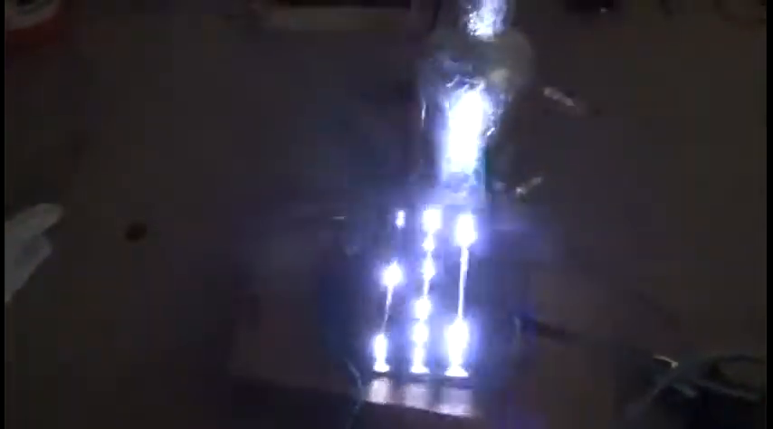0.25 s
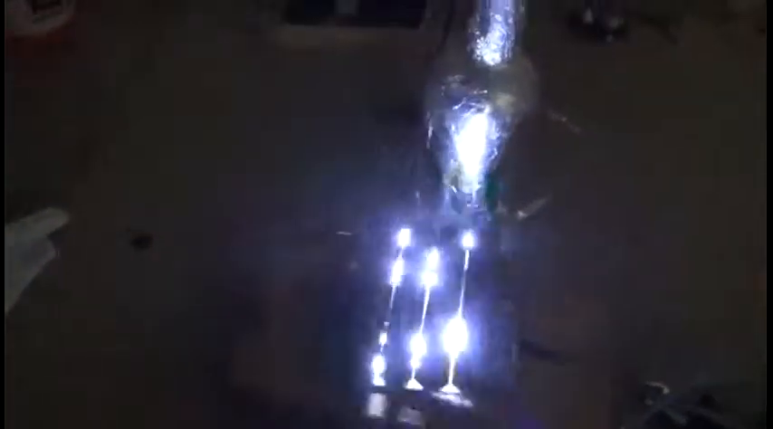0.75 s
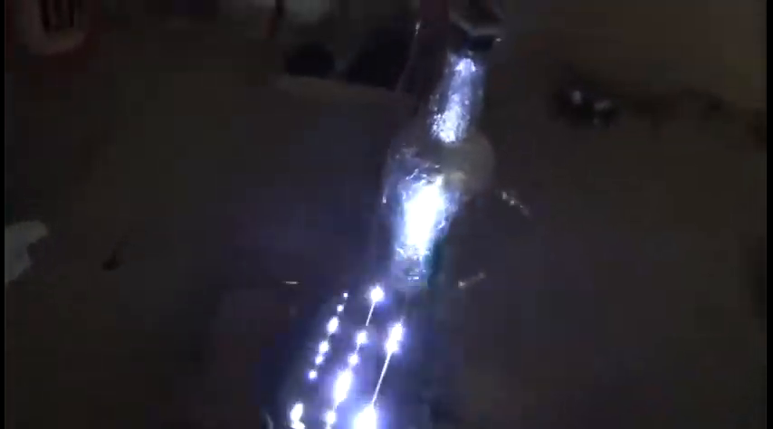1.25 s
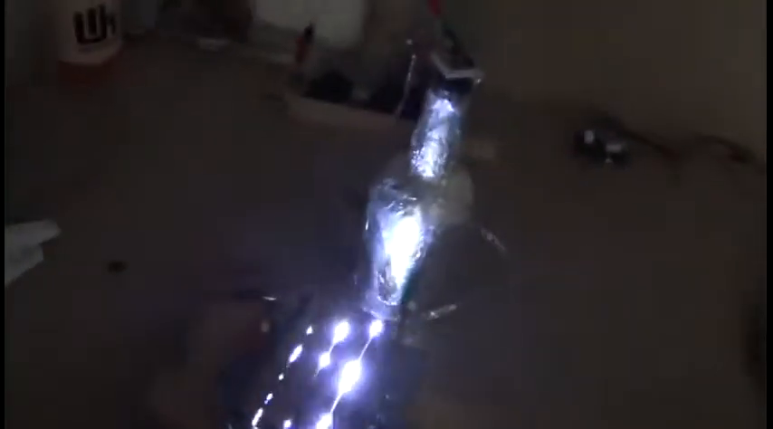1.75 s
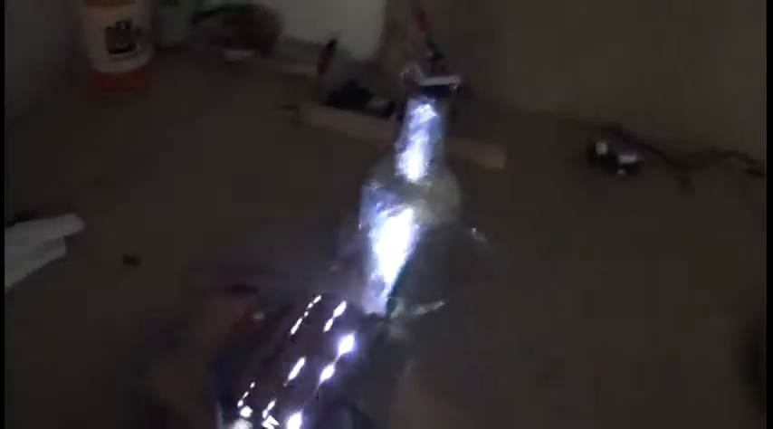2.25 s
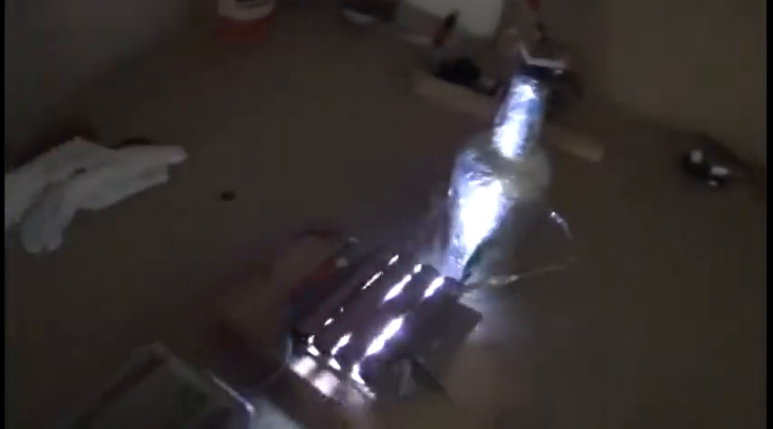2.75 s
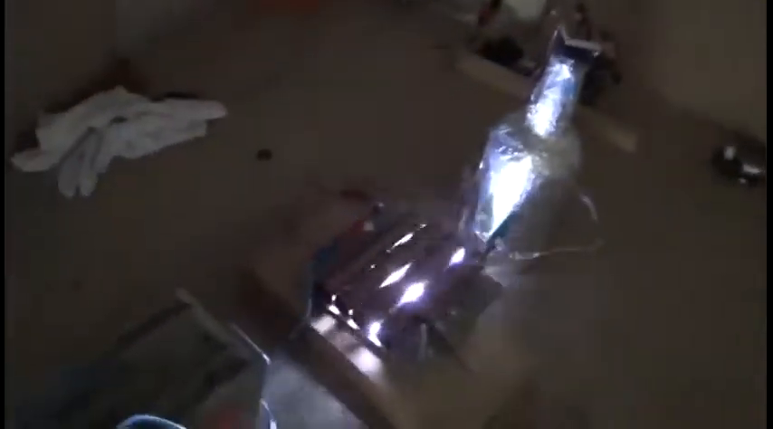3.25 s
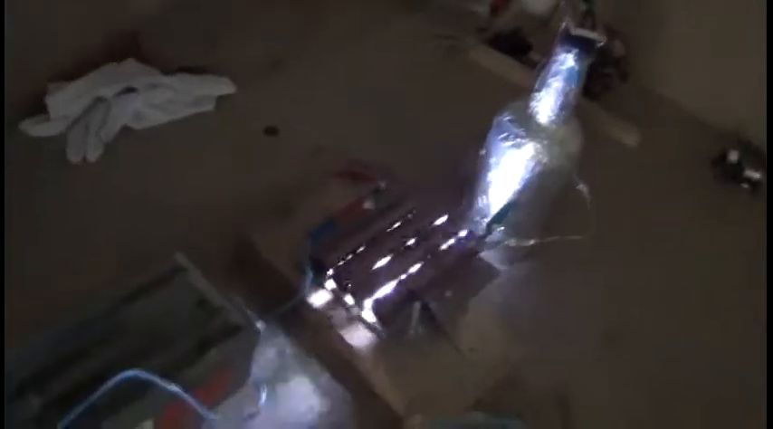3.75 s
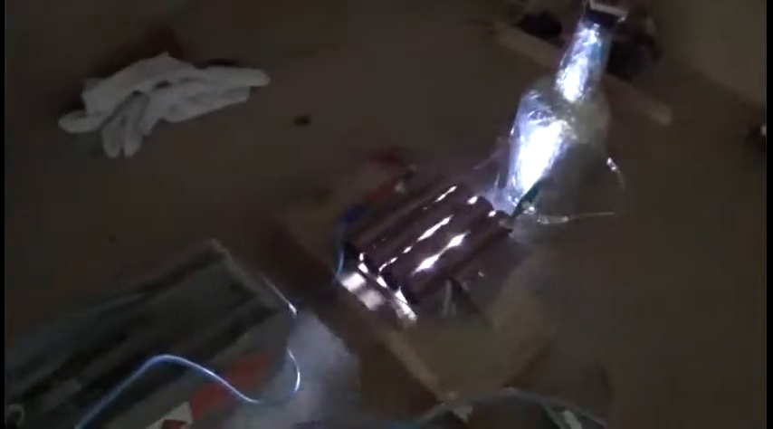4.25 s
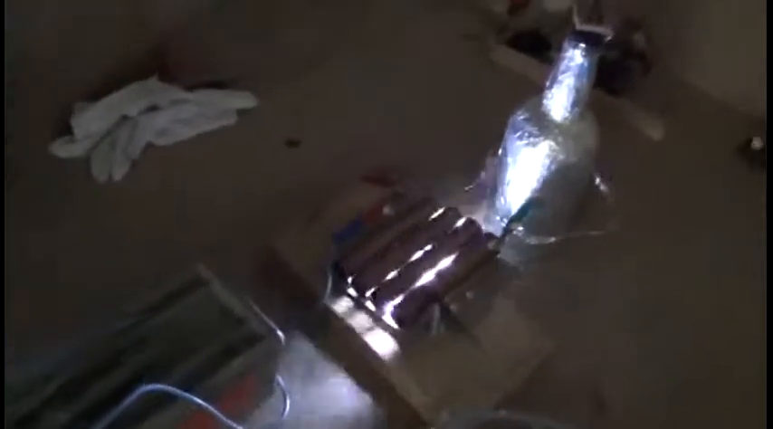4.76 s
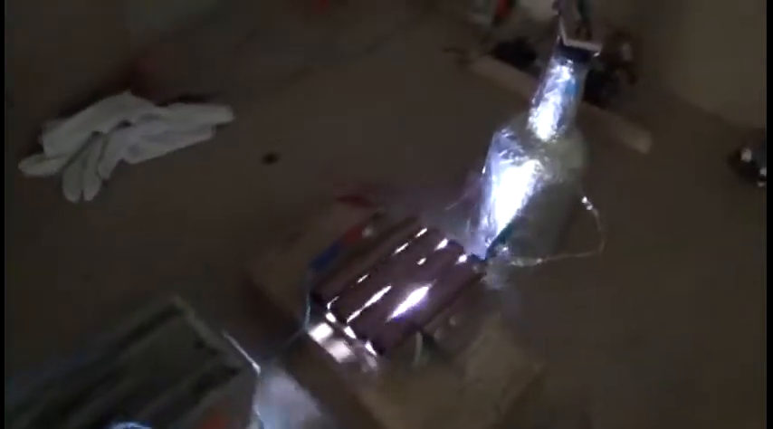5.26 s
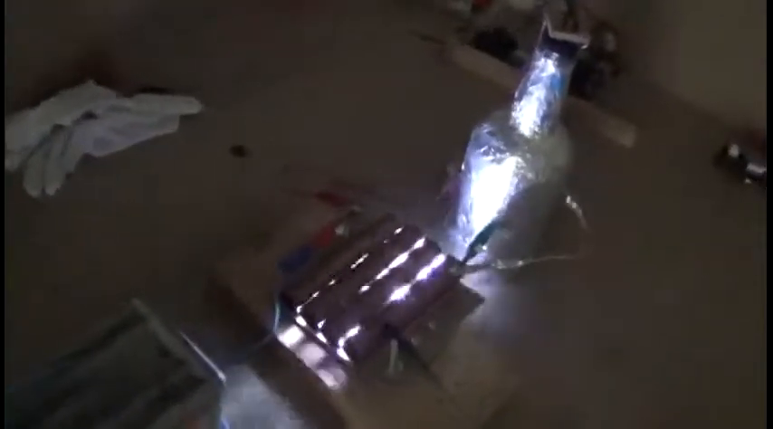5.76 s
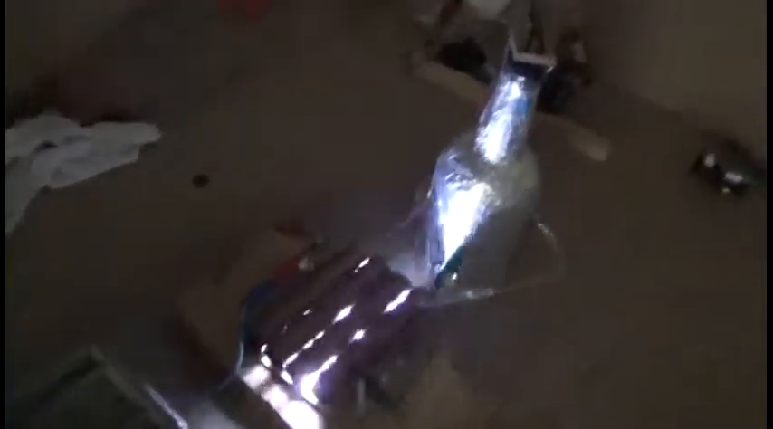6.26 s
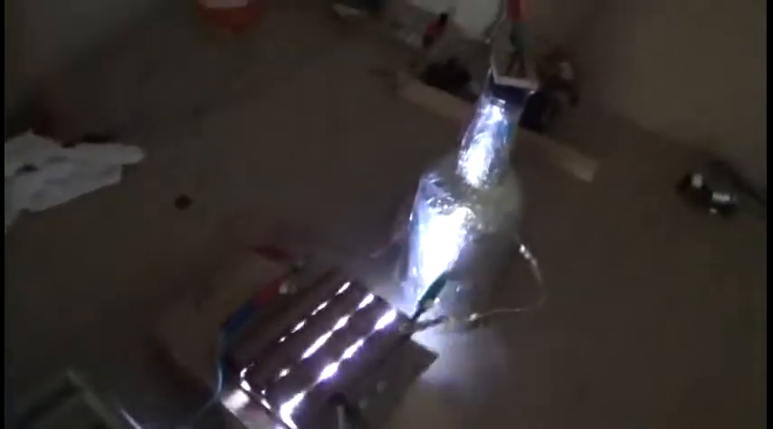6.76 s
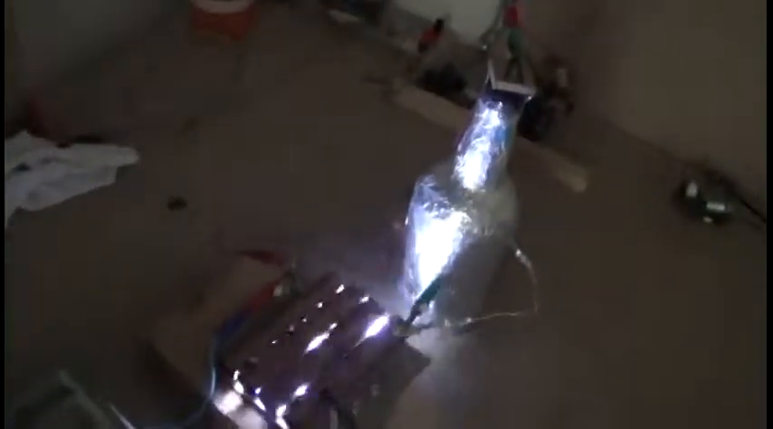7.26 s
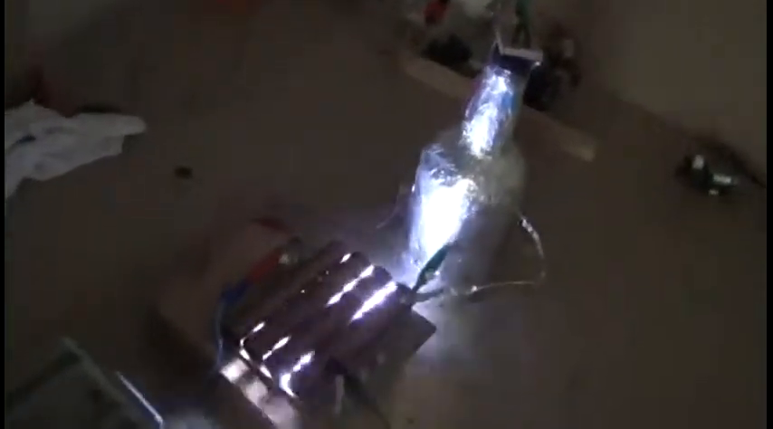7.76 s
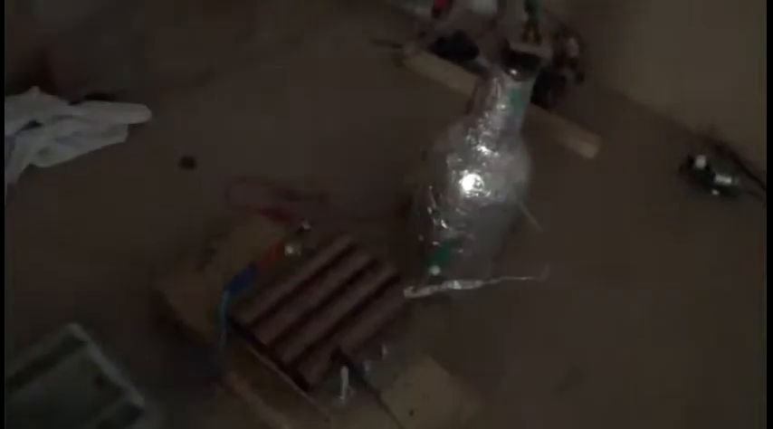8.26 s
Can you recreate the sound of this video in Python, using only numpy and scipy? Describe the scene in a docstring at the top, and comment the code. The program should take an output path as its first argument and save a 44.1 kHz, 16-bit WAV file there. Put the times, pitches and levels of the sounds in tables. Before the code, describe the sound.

Dense, bright electric sparks crackle and buzz in a bare room until they cut out and a power switch clicks.

```python
"""A harsh electric crackle over a low buzz, in a bare room, heard through two closely spaced mic ports.
A multi-gap spark gap, fed from a mains transformer and a bottle capacitor, fires a volley of sparks
every half cycle; charge left on the capacitor makes the volleys alternately long and short.
Air rings in the electrode tubes. The cracks' ultrasound overdrives the microphone, which turns their
envelope into the buzz. Near the end the sparks stop and the power switch snaps."""
import sys
import numpy as np
from scipy import signal
from scipy.fft import rfft, irfft, next_fast_len
from scipy.io import wavfile
from scipy.ndimage import uniform_filter1d

SR = 44100
rng = np.random.default_rng(int(sys.argv[2]) if len(sys.argv) > 2 else 0)


def output_pcm(signal):
    """Save a mono or channel-first signal as 16-bit PCM at the path in sys.argv[1].

    Samples are clipped to [-1, 1] before scaling.
    """
    pcm = np.clip(np.atleast_2d(signal).T, -1, 1) * 32767
    wavfile.write(sys.argv[1], SR, np.round(pcm).astype(np.int16))


N = 374850
HALF_CYCLE_S, OFF_S = .01, 8.281
GRAIN_ALIKE, GRAIN_FROM_HZ = 0.22, 190   # low crackle: left-right likeness, lower edge
LEFT_RIGHT = np.array([[1], [-1]])

# snap and bounces of the switch: t/s, level/dB
SWITCH_HITS = [(8.3348, -40.5), (8.337, -36.5), (8.341, -47), (8.345, -44), (8.35, -51), (8.355, -41.5),
               (8.361, -58)]
# modes of the switch and its case: f/Hz, gain/dB, t60/s
SWITCH_MODES = [(350, -12, .08), (396, -13, 0.12), (462, -16.5, 0.18), (493, -20, 0.074), (657, -11, 0.064),
                (1150, -4.5, 0.029), (1910, 2, 0.014), (2430, -8, 0.012), (3300, 2.5, 0.0052),
                (4900, 9.5, 0.0035), (10200, 5, 0.0056)]
# fuller sputters in the low crackle: t/s, level/dB
SPUTTERS = [(0.15, -40), (0.246, -30), (0.284, -33), (0.346, -35), (0.423, -48), (0.464, -46),
            (0.505, -29.5), (0.535, -32), (0.579, -34), (0.623, -35), (0.997, -34), (1.124, -35),
            (1.265, -31), (1.297, -28), (1.374, -41), (1.406, -31), (1.484, -31), (1.609, -32),
            (1.797, -32), (1.858, -40), (2.185, -37), (2.357, -41), (2.667, -38), (2.856, -39),
            (5.186, -35), (5.266, -44), (6.177, -35), (6.926, -32), (7.218, -39), (7.697, -34)]
# strength of the microphone's overload buzz: t/s, level/dB
BUZZ_LEVEL = [(0.0, -55), (0.02, -41), (0.07, -45), (1.22, -44.5), (1.31, -38.5), (1.35, -45.5),
              (1.75, -48), (1.86, -39.5), (2.02, -46.5), (3.26, -56.5), (3.57, -49.5), (3.8, -56.5),
              (5.22, -55.5), (5.29, -47.5), (5.34, -54), (5.71, -53), (7.5, -51), (8.26, -54)]
# volley lag behind the half-cycle grid, by mains drift and distance to the mic: t/s, lag/ms
VOLLEY_LAG = [(0.0, 1.14), (4.5, 2.5), (8.5, 2.75)]
# the capacitor's bias changes side: t/s, bias (positive = even volleys long)
CAPACITOR_BIAS = [(0.015, -0.68), (0.365, 1), (0.695, -0.74), (1.005, 0.46), (1.305, -0.55), (1.405, 0.83),
                  (1.605, -0.84), (1.795, 0.71), (1.915, -0.39), (2.005, 0.78), (2.235, -0.39),
                  (2.335, 0.61), (2.515, -0.96), (2.605, 0.52), (2.705, -0.33), (2.885, 0.53),
                  (2.925, -0.26), (2.975, 0.86), (3.205, -0.88), (3.245, 0.78), (3.565, -0.99),
                  (3.775, 0.89), (4.045, -0.58), (4.115, 0.53), (4.205, -0.94), (4.535, 0.53),
                  (4.855, -0.82), (5.015, 0.43), (5.165, -0.67), (5.335, 0.42), (5.585, -0.4),
                  (5.635, 0.67), (5.855, -0.094), (5.915, 0.4), (6.085, -0.56), (6.185, 0.92),
                  (6.385, -0.88), (6.525, 0.65), (6.795, -0.56), (6.995, 1), (7.105, -0.5), (7.145, 0.54),
                  (7.285, -0.46), (7.355, 0.64), (7.475, -0.71), (7.615, 0.58), (7.925, -0.57),
                  (8.095, 0.81)]
# loudness of the cracks at the mic: t/s, level/dB
CRACK_LEVEL = [(0.0, -22.5), (1.4, -21), (1.42, -23), (1.77, -20), (1.84, -21), (1.89, -24), (1.93, -25),
               (2.0, -20), (3.18, -21), (3.73, -21), (3.8, -22), (4.3, -20.5), (4.6, -23.5), (4.69, -20.5),
               (4.81, -21), (7.08, -20), (8.21, -21.5), (8.26, -23)]
# loudest treble bursts: t/s, relative level/dB, length/ms
BURSTS = [(0.8694, -13, 4), (1.4102, -8, 3.7), (1.4184, -4, 4.4), (1.4396, -7, 4), (1.4596, -19, 4),
          (1.481, -7, 3.1), (1.5, -3, 4.2), (1.5205, -15, 3.5), (1.5599, -6, 3.7), (1.5798, -7, 4),
          (1.8013, -9, 3.9), (1.8218, -12, 3.6), (1.8304, -17, 4), (1.8397, -9, 4), (1.92, -2, 5.3),
          (1.9304, -3.5, 5.8), (1.9494, -7, 5.3), (1.9694, -13, 4), (2.0887, -8, 3.7), (2.4409, -10, 4),
          (2.5386, -6, 4), (2.5706, -10, 4), (2.952, -5, 4.7), (3.1004, -6, 5.5), (3.302, -1, 2.4),
          (3.4002, -10, 3.1), (3.5084, -7, 4.2), (3.6306, 0, 2.4), (3.71, -3, 5.8), (4.2298, -4, 3.7),
          (5.1407, -7, 4), (5.16, -13, 4), (5.3892, -9, 6.2), (5.662, -5, 3.2), (5.7698, 0, 3.1),
          (5.891, -5, 4), (6.0906, -7, 5.4), (6.1504, -14, 4), (6.4108, -8, 4.6), (6.4717, -3, 4.3),
          (6.7104, -2, 6.2), (6.8199, -13, 4), (6.93, -0.5, 5.1), (6.991, 0, 4.7), (7.0838, -7, 3.6),
          (7.1307, -6.5, 5), (7.1405, -10, 2.3), (7.1505, -13, 3.5), (7.17, -8, 2.5), (7.23, -8, 2.9),
          (7.3891, -1, 2.8), (7.471, -6, 4.6), (7.8426, -5, 3.6), (8.0391, -6, 4)]
# the gap flares in straight view of the mic: t/s, length/s, treble lift/dB (only lifts above 0 act)
FLARES = [(0.0, 0.2, -1.5), (1.416, 0.15, 2.5), (1.793, 0.2, 3), (3.503, .26, 1.5), (6.04, 0.14, 1.5),
          (6.953, 0.37, -0.5)]
# spectral shape of the sparks: f/Hz, gain/dB
SPARK_SPECTRUM = [(760, -26.5), (1300, -26), (2220, -20.5), (2670, -17.5), (3250, -21), (3620, -16.5),
                  (6010, -15.5), (9800, 1), (10900, 2.5), (14200, -39), (22000, -120)]
# air resonances in the electrode tubes: f/Hz, width/Hz, gain/dB
TUBE_MODES = [(1744, 130, -10.5), (2720, 115, -1.5), (4020, 65, -0.5), (4750, 340, -9.5), (5830, 230, -3),
              (6350, 96, -2.5)]
# a tube rings out for a few volleys: middle t/s, f/Hz, half length/ms, level/dB re the band's average
TUBE_PINGS = [(0.04, 4050, 35, 7), (0.236, 2660, 33, 14), (0.331, 6700, 31, 15), (0.37, 6150, 40, 9),
              (0.52, 4030, 27, 8), (0.546, 1710, 81, 10), (0.61, 4030, 25, 9), (0.729, 5970, 49, 16),
              (0.74, 3980, 25, 8), (0.817, 5970, 66, 15), (0.856, 4040, 35, 13), (0.892, 1790, 31, 11),
              (0.902, 4020, 39, 14), (1.025, 4050, 25, 8), (1.09, 4100, 35, 10), (1.13, 4780, 40, 7),
              (1.151, 1720, 35, 9), (1.548, 4110, 35, 12), (1.617, 1590, 33, 12), (1.803, 1600, 29, 9),
              (1.946, 1590, 43, 9), (1.947, 2770, 61, 12), (2.339, 3800, 31, 13), (2.386, 2710, 28, 23),
              (2.537, 6300, 37, 9), (2.54, 2730, 33, 7), (2.648, 2640, 98, 9), (2.971, 2770, 48, 16),
              (3.165, 2760, 47, 7), (3.382, 2700, 77, 13), (3.455, 2650, 45, 14), (3.844, 2660, 25, 16),
              (3.916, 2600, 37, 16), (4.786, 4720, 37, 10), (4.945, 3670, 51, 17), (5.02, 6400, 45, 7),
              (5.047, 2720, 31, 10), (5.201, 6400, 50, 7), (5.279, 2630, 63, 8), (5.313, 2640, 100, 6),
              (5.455, 2700, 53, 7), (5.559, 2700, 39, 7), (5.578, 6540, 65, 2), (5.72, 6500, 45, 8),
              (5.724, 2640, 45, 7), (5.98, 2600, 49, 7), (6.137, 2700, 26, 16), (6.23, 2700, 35, 8),
              (6.369, 2650, 33, 11), (6.729, 4110, 39, 11.5), (6.983, 2650, 37, 7), (7.244, 2580, 29, 7),
              (7.346, 2670, 59, 8), (7.57, 2590, 37, 8), (7.784, 4720, 31, 19)]
# as the mic moves about the room: t/s, left minus right/dB, then gain/dB for each of the six tube modes
MIC_STANCE = [(0.0, -0.82, 11, -13, 4, 2, 0, 1), (.6, -0.71, 15, -5, 4.5, -1, 4, 10),
              (.85, -0.53, 14, 3, 5, -10, 8, -4), (1.15, -0.41, 12, -8, -1, 5, -5, -2),
              (1.5, -0.073, 7, 4, -8, -21, -2, -5), (2.2, 0.37, -8, -1, 2, -9, 0, -11),
              (3.4, -0.41, -15, -3, -10, 3, 3, -8), (4.5, -0.14, -8, 1, -18.5, 6, 1, 5),
              (5.8, 0.15, -4, -1, -2, 0, 0, 1), (6.8, 0.33, 4.5, 3, 2, -4, -13, -14),
              (8.0, 0.22, 4, -4, -3, 6, -4, 1)]
# reverberation of the bare room: band from f/Hz (the first takes all below the second), t60/s, gain/dB
ROOM_BANDS = [(2000, 0.41, -0.5), (4500, 0.32, -2.5), (8400, .27, -5)]
# left-right difference between the mic ports: f/Hz, gain/dB
PORT_SIDE_GAIN = [(35, -12), (70, -3), (130, -1.5), (250, -2.5), (600, 0), (1200, 2), (2200, -.4),
                  (6000, 0), (9000, 1.5), (11000, -1.5)]


def amp(db):
    """Gain of a level in dB."""
    return 10 ** (np.asarray(db) / 20)


def unit_rms(x):
    """Scaled to unit rms."""
    return x / np.sqrt(np.mean(x ** 2) + 1e-20)


def at_hz(rows, hz):
    """A table read on a log-frequency axis."""
    row_hz, values = np.transpose(rows)
    return np.interp(np.log(hz + 1), np.log(row_hz), values)


def in_time(rows):
    """Table columns as curves over all samples."""
    times, *columns = np.transpose(rows)
    return [np.interp(np.arange(N) / SR, times, column) for column in columns]


def butter(x, hz, kind, order=2):
    """Butterworth filter along time."""
    return signal.sosfilt(signal.butter(order, hz, kind, fs=SR, output="sos"), x)


def resonance(x, hz, width_hz):
    """Two-pole band with gain 1 on top."""
    r = np.exp(-np.pi * width_hz / SR)
    feedback = [1, -2 * r * np.cos(2 * np.pi * hz / SR), r * r]
    return signal.lfilter((1 - r * r) / 2 * np.array([1, 0, -1]), feedback, x)


def fade(clicks, ms):
    """Each click becomes a jump and an exponential fall."""
    return signal.lfilter([1], [1, -np.exp(-1000 / (ms * SR))], clicks + 1e-18)


def flicker(db, rate_hz):
    """A gain that wanders by chance."""
    knots = amp(db * np.clip(rng.standard_normal(int(N / SR * rate_hz) + 2), -3, 1.8))
    return np.interp(np.arange(N) * (rate_hz / SR), np.arange(len(knots)), knots)


def hiss(alike):
    """Stereo white noise of a given left-right likeness."""
    mid, side = rng.standard_normal((2, N))
    return np.sqrt((1 + alike) / 2) * mid + np.sqrt((1 - alike) / 2) * side * LEFT_RIGHT


def lingering(power, t60_s):
    """Amplitude of the diffuse field: the room stores sound power and lets it out slowly."""
    r = amp(-120 / (t60_s * SR))
    stored = r * power[:SR // 10].mean()
    return np.sqrt(signal.lfilter([1 - r], [1, -r], power, zi=[stored])[0])


def room(power):
    """Early reflections off the floor and near walls, and a diffuse tail whose treble dies first."""
    noise = hiss(alike=0.62)
    low, high = butter(noise, ROOM_BANDS[1][0], "low"), butter(noise, ROOM_BANDS[2][0], "high")
    bands = low, noise - low - high, high
    diffuse = sum(amp(db) * band * lingering(power, t60) for band, (_, t60, db) in zip(bands, ROOM_BANDS))
    early = amp(-4) * noise[::-1, ::-1][::-1] * lingering(power, t60_s=0.071)
    return early, diffuse


def power_switch(room_t60_s=0.36, room_db=-35.5):
    """The switch snaps and bounces, its case rings with little bass, and the room answers."""
    hits, ring = np.zeros(N) + 1e-18, 0
    for at, db in SWITCH_HITS:
        hits[int(at * SR)] = amp(db)
    for k, (hz, db, t60) in enumerate(SWITCH_MODES):
        r, w = amp(-60 / (t60 * SR)), 2 * np.pi * hz / SR
        mode = signal.lfilter([0, np.sin(w)], [1, -2 * r * np.cos(w), r * r], hits)
        ring = ring + (-1) ** k * amp(db) * mode
    snap = butter(ring, 300, "high")
    t = np.arange(SR // 4) / SR
    tail = rng.standard_normal((2, len(t))) * amp(-60 * t / room_t60_s + room_db)
    return snap + signal.fftconvolve(snap[None], tail, axes=1)[:, :N]


def sputters(length_ms=13.5, crest_db=6, thump_db=-15):
    """Each sputter is a rough low puff with a soft thump."""
    clicks = np.zeros(N)
    for at, db in SPUTTERS:
        clicks[int(at * SR)] = amp(db - crest_db)
    puff = np.convolve(clicks, np.hanning(int(length_ms * SR / 1000)))[:N]
    rough = unit_rms(butter(hiss(GRAIN_ALIKE), [GRAIN_FROM_HZ, 1370], "band"))
    return puff * rough + amp(thump_db) * butter(puff, 60, "high")


def mic_overload(envelope, grain_db=7, hum_db=-0.1, deep_db=-15.5):
    """The capsule rectifies ultrasound: the volley shape becomes a mains buzz, its grain low crackle."""
    db, = in_time(BUZZ_LEVEL)
    shape = unit_rms(fade(envelope, ms=0.65))
    reflected = 0.44 * unit_rms(lingering(envelope ** 2, t60_s=.09))   # ultrasound fills the gaps
    noise = butter(hiss(GRAIN_ALIKE), 1820, "low") * flicker(db=2, rate_hz=20)
    grain = amp(grain_db) * butter((shape + reflected) * noise, GRAIN_FROM_HZ, "high")
    hum = shape + amp(-7.5) * resonance(shape, hz=152, width_hz=68)   # third mains harmonic stands out
    hum *= flicker(db=2, rate_hz=9)
    hum *= amp(hum_db - .5 * (db - db.mean()))   # the hum swings half as far as the grain
    rectified = amp(db) * (grain + hum)
    return butter(rectified, 130, "high") + amp(deep_db) * butter(rectified, 58, "high", order=3)


def tube_pings(cracks, width_hz=270):
    """A tube rings out: a narrow band of the cracks swells above its usual level."""
    out = np.zeros_like(cracks)
    for at, hz, half_ms, db in TUBE_PINGS:
        half = int(half_ms * SR / 1000)
        start, end = max(int(at * SR) - half, 0), int(at * SR) + half
        narrow = resonance(resonance(cracks, hz, width_hz), hz, width_hz)
        swell = np.hanning(end - start)
        out[:, start:end] += amp(db) * narrow.std() * swell.std() * unit_rms(swell * narrow[:, start:end])
    return out


def spark_colour(cracks, rings_db, glint_db=-5):
    """Rising spark spectrum; the tubes ring on top, and narrow bands glint as the sparks wander."""
    size = next_fast_len(N)
    tilt = amp(at_hz(SPARK_SPECTRUM, np.fft.rfftfreq(size, 1 / SR)))
    bright = irfft(rfft(cracks, size) * tilt, size)[:, :N]
    out = bright + tube_pings(bright)
    for (hz, width_hz, db), ring_db in zip(TUBE_MODES, rings_db):
        out += amp(db + ring_db) * flicker(db=4.5, rate_hz=14) * resonance(bright, hz, width_hz)
    for hz in np.geomspace(2350, 10400, 22):
        out += amp(glint_db) * flicker(db=6, rate_hz=22) * resonance(bright, hz, width_hz=75)
    return out


def shifting_reflections(cracks, count=9):
    """Sparks jump along the gaps, so their reflections lift and sink each band on its own."""
    edges_hz = np.geomspace(3000, 12500, count + 1)[1:-1]
    size = next_fast_len(N)
    spectrum = rfft(cracks, size)
    band_of_bin = np.searchsorted(edges_hz, np.fft.rfftfreq(size, 1 / SR))
    bands = (irfft(spectrum * (band_of_bin == k), size)[:, :N] for k in range(count))
    return sum(flicker(db=2.5, rate_hz=35) * band for band in bands)


def treble_bursts(envelope, crest_db=6.5):
    """Extra treble envelope: a short plateau for each loud burst, and stronger volleys during flares."""
    plateaus, flare = np.zeros(N), np.zeros(N)
    for at, db, ms in BURSTS:
        plateaus[int(at * SR):int((at + ms / 1000) * SR)] = amp(db - crest_db)
    for at, length, db in FLARES:
        flare[int(at * SR):int((at + length) * SR)] = max(amp(2 * db) - 1, 0)
    level = amp(in_time(CRACK_LEVEL)[0]) * envelope
    flare_power = np.abs(uniform_filter1d(flare, SR // 50)) * level ** 2
    return np.sqrt(butter(plateaus, 1500, "low", order=1) ** 2 + flare_power + 1e-18)


def volleys(max_sparks=16, spacing_ms=.5, mean_ms=4.22, bias_ms=1.98):
    """Envelope of all sparks: one jittered train each half cycle, every spark fading fast."""
    k = np.arange(int(OFF_S / HALF_CYCLE_S) + 1)[:, None]   # a row per volley
    grid_s = k * HALF_CYCLE_S
    centre_s = grid_s + np.interp(grid_s, *np.transpose(VOLLEY_LAG)) / 1000
    since_s, side = np.transpose(CAPACITOR_BIAS)
    bias = side[np.maximum(np.searchsorted(since_s, grid_s) - 1, 0)] * (-1.) ** k
    length_ms = mean_ms + bias_ms * bias + rng.normal(0, 0.39, k.shape)
    after_ms = np.cumsum(spacing_ms * rng.uniform(.3, 1.7, (len(k), max_sparks)), axis=1) - spacing_ms
    rise = np.clip(.5 + 2.5 * after_ms / np.maximum(length_ms, 1), 0, 1)
    fall = np.clip((length_ms - after_ms) / 1.03, 0, 1)
    strength = rise * fall * amp(-2 * bias + rng.normal(0, 1, k.shape))   # short volleys spark harder
    before_burst = (np.array(BURSTS)[:, 0] / HALF_CYCLE_S + .5).astype(int) - 1
    strength[before_burst] *= amp(0.5)
    when_s = centre_s + (-3 + .25 * bias + after_ms) / 1000   # short volleys start a little sooner
    samples = np.clip(when_s * SR, 0, N - 1).astype(int)
    clicks = np.bincount(samples.ravel(), (strength * (when_s < OFF_S)).ravel(), N)
    return unit_rms(fade(clicks, ms=0.45))


def spark_gap(envelope, beam_in_room_db=-16, lower_db=-9, lower_follows=0.32):
    """Cracks of noise reach the mic direct and off the walls; the treble is beamed and swings most."""
    db, = in_time(CRACK_LEVEL)
    pan_db, *rings_db = in_time(MIC_STANCE)
    beam = treble_bursts(envelope)
    gain = amp(db) * flicker(db=0.04, rate_hz=20)
    sparks = envelope * gain
    early, diffuse = room(sparks ** 2 + amp(beam_in_room_db) * beam ** 2)
    noise = hiss(alike=0.69)
    in_sight = flicker(db=0.97, rate_hz=11)   # sparks hop in and out of sight
    direct = in_sight * sparks * noise + butter(beam * noise, 8000, "high")
    cracks = spark_colour(shifting_reflections(direct + early) + diffuse, rings_db)
    upper = unit_rms(butter(cracks, 5080, "high", order=3))
    lower = unit_rms(butter(cracks, 6530, "low", order=3)) * amp(lower_db)
    lower *= (gain / gain.mean()) ** (lower_follows - 1)
    return np.sqrt(np.mean(gain ** 2)) * (upper - lower) * amp(pan_db / 2 * LEFT_RIGHT)


def scene():
    """At the mic: the spark gap, its buzz and sputters, and the switch, over a faint hiss."""
    envelope, switch = volleys(), power_switch()
    return spark_gap(envelope) + mic_overload(envelope) + sputters() + switch + amp(-78) * hiss(0.57)


def record(dry, rumble_hz=31, ceiling=.42, cutoff_hz=11025):
    """Two close mic ports hear the deep bass alike; peaks are rounded, rumble and top are cut."""
    size = next_fast_len(N + SR // 10)
    hz = np.fft.rfftfreq(size, 1 / SR)
    side = irfft(rfft((dry[0] - dry[1]) / 2, size) * amp(at_hz(PORT_SIDE_GAIN, hz)), size)[:N]
    ports = butter(dry.mean(axis=0) + side * LEFT_RIGHT, rumble_hz, "high")
    rounded = ceiling * np.tanh(ports / ceiling)
    passband = np.clip((cutoff_hz - hz) / 30 + .5, 0, 1)
    return irfft(rfft(rounded, size) * passband, size)[:, :N]


dry = scene()
out = record(dry)
output_pcm(out)
```